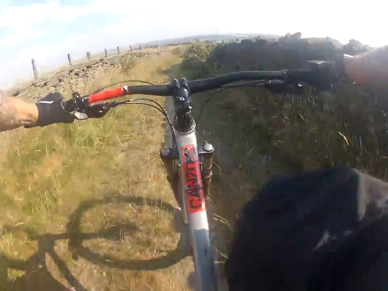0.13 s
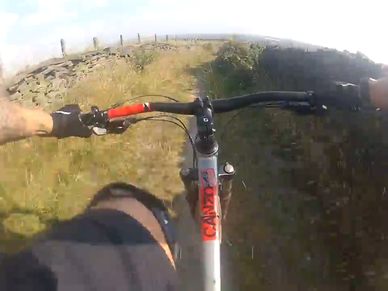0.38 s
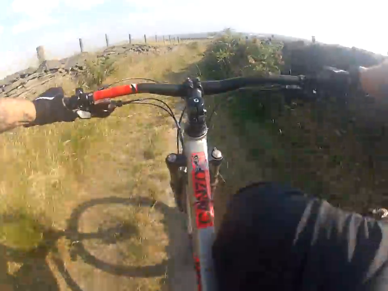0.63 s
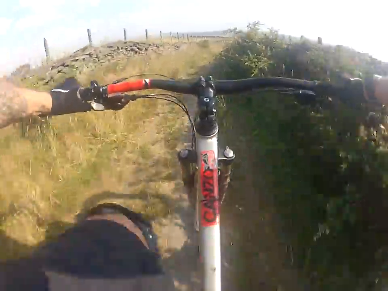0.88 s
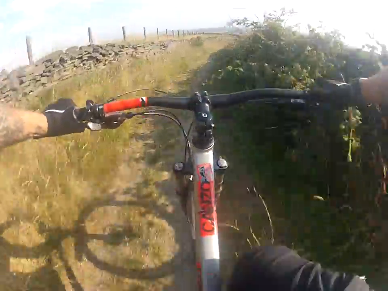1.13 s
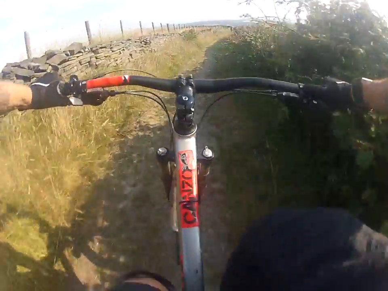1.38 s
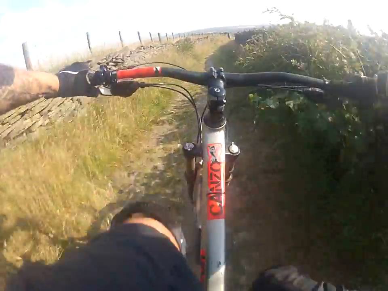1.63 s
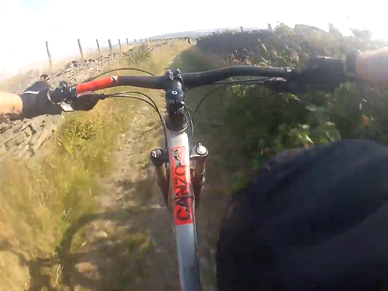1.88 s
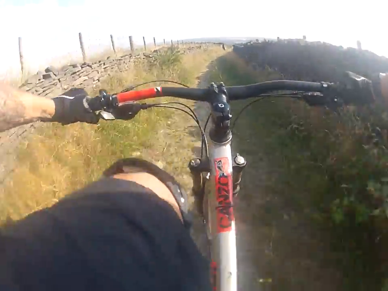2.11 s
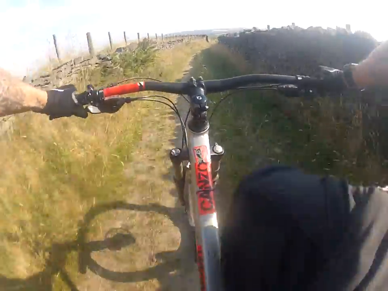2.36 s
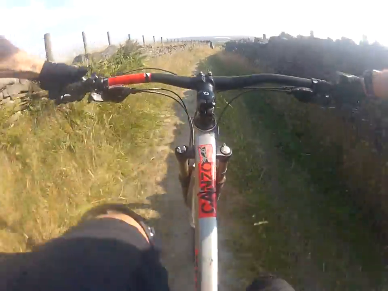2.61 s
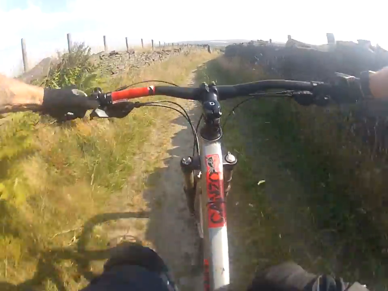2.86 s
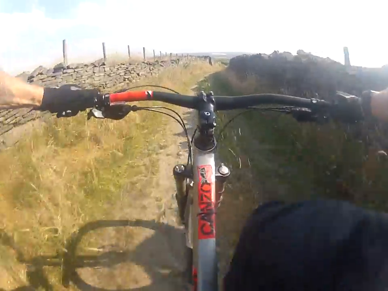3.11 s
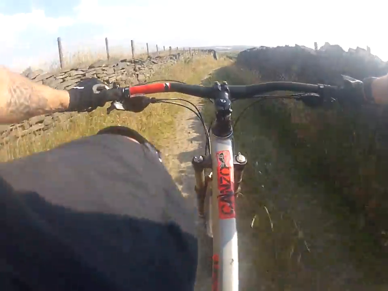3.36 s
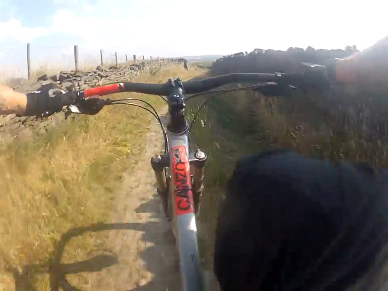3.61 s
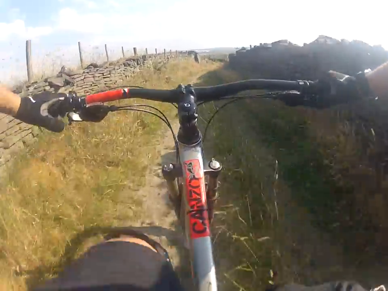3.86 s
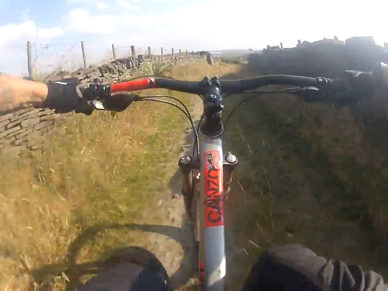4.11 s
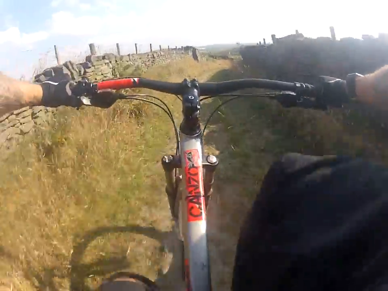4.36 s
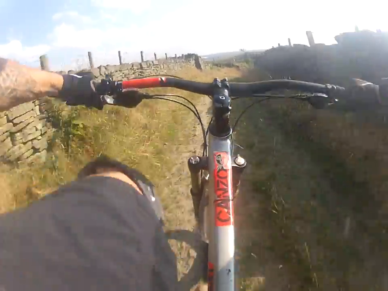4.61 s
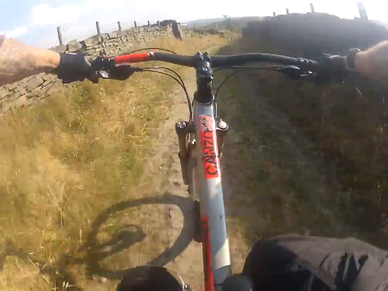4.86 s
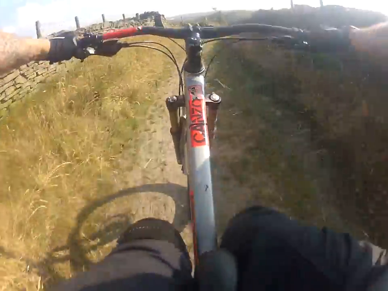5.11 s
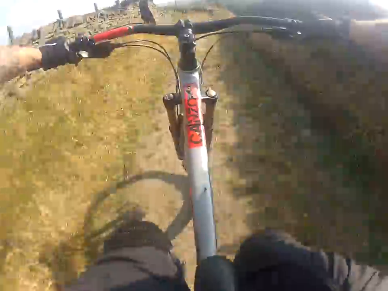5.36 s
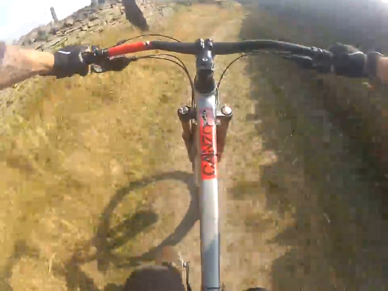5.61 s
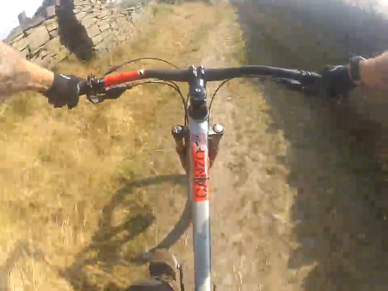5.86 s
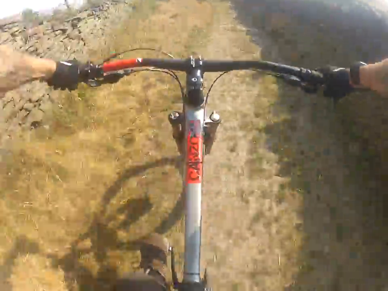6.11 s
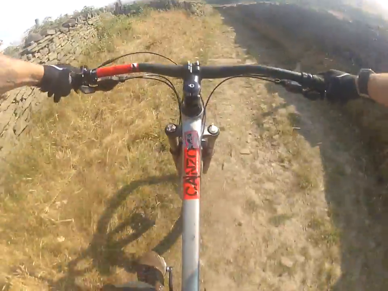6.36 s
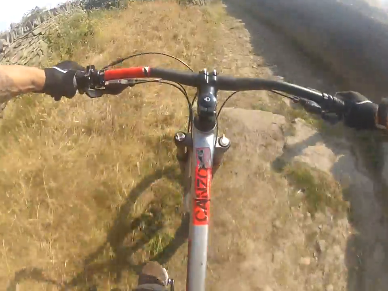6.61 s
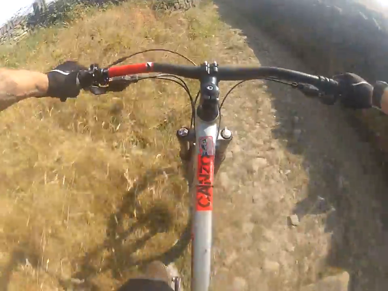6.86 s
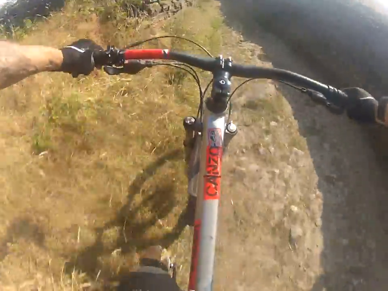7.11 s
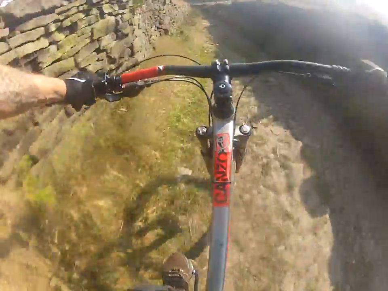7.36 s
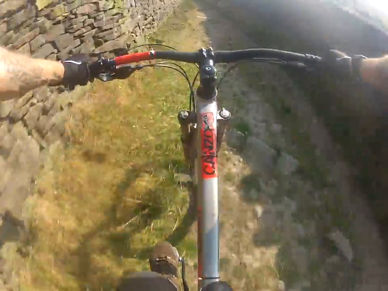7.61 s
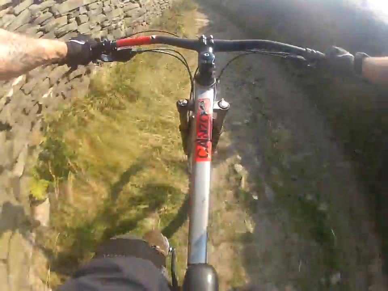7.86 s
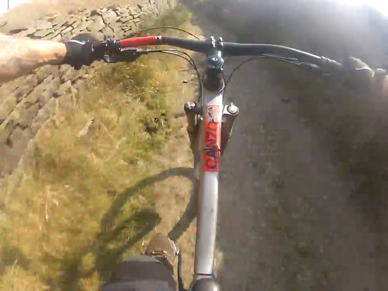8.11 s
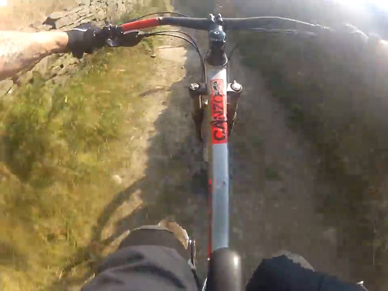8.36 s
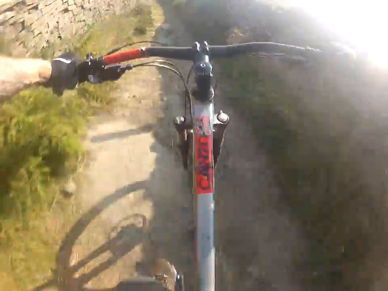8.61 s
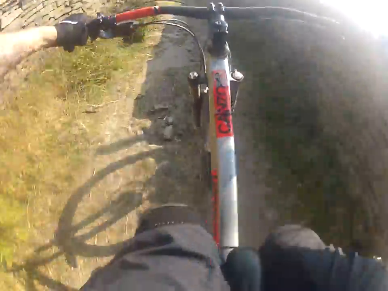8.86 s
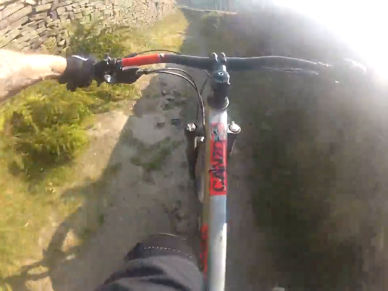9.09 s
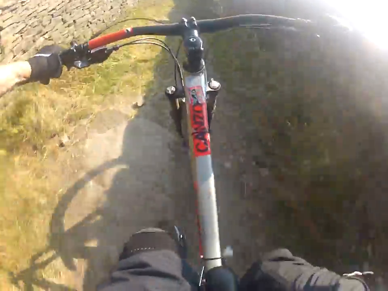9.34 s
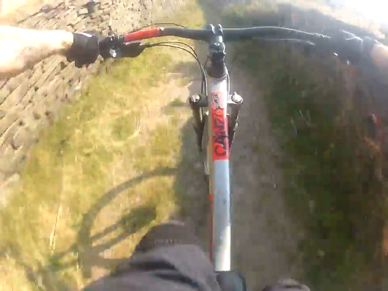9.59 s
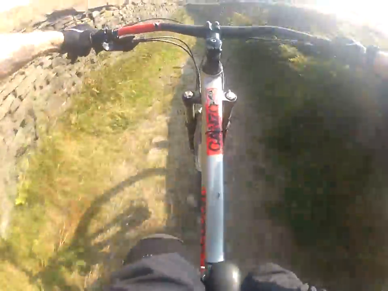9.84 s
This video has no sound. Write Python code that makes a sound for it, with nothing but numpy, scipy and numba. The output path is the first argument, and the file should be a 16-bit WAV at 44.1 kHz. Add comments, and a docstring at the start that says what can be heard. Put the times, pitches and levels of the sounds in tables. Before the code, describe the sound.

Muffled, low-heavy outdoor ride noise from a body-worn microphone in a closed case. Tyres thrum over dirt while the body's sway makes lumpy deep rumble. Bumps arrive as soft but overpowering thuds, loose parts tick and clack, fabric briefly hisses. It is bumpy at first, quieter in the middle, then grittier and harsher over stones, with a violent double bang late on. The treble is thin, crunchy and distorted on the hardest hits.

```python
"""Mountain bike on a stony track

A bike rolls down a stony track, heard by a small camera in a closed case strapped to the rider's chest.
Shaped noise makes the sway, strap thrum, drone and grit; fabric scuffs and loose parts ring case resonances.
Bumps jolt the case as slow pressure pushes, the loudest thing heard.
A gain control ducks the hardest blows; a low-rate converter clips and mirrors all into a thin treble."""
import sys
import numpy as np
from scipy import signal
from scipy.fft import rfft, irfft, next_fast_len
from scipy.io import wavfile
from scipy.ndimage import uniform_filter1d
from numba import njit

SR = 44100
rng = np.random.default_rng(int(sys.argv[2]) if len(sys.argv) > 2 else 0)


def boost(x):
    """Linear amplitude factor 10**(x/20) for a level x in decibels (scalar or array-like)."""
    u = np.asarray(x, float) / 20
    return 10 ** u


def file_out(sig):
    """Save sig as 16-bit WAV at sys.argv[1]."""
    # one column per channel
    cols = np.atleast_2d(sig).T
    # limit, then scale
    lim = np.clip(cols, -1, 1)
    pcm = np.round(lim * 32767).astype(np.int16)
    wavfile.write(sys.argv[1], SR, pcm)


N = 439677
T = np.arange(N) / SR


def unit(x):
    """Scale to rms 1."""
    return x / np.sqrt(np.mean(x ** 2))


def colour(x, points):
    """Shape to a (hz, db) spectrum curve by filtering in the frequency domain, rms 1."""
    hz, db = np.transpose(points)
    size = next_fast_len(N)
    f = np.maximum(np.arange(size // 2 + 1) * SR / size, 1)
    curve_db = np.interp(np.log(f), np.log(hz), db, -120, -120)
    return unit(irfft(rfft(x, size) * boost(curve_db), size)[:N])


def ring(x, modes):
    """Sum of resonances (hz, width_hz, level_db) with alternating sign."""
    out = 0
    for k, (hz, width_hz, db) in enumerate(modes):
        b, a = signal.iirpeak(hz, hz / width_hz, SR)
        out = out + (-1) ** k * boost(db) * signal.lfilter(b, a, x)
    return out


def walk(rate_hz):
    """Random levels held 1 / rate_hz s and slewed twice; spread near 1."""
    k = int(SR / rate_hz)
    held = np.repeat(rng.standard_normal(N // k + 1), k)
    return 1.56 * uniform_filter1d(uniform_filter1d(held, k), k)[:N]


def grains(rate_hz, spread_db, tail_ms, bed):
    """Dense short noise bursts, a few much larger, over a steady bed."""
    sizes_db = spread_db * np.minimum(rng.exponential(size=N), 3)
    starts = (rng.random(N) < rate_hz / SR) * boost(sizes_db)
    fade = np.exp(-1000 / (tail_ms * SR))
    envelope = bed + unit(signal.lfilter([1], [1, -fade], starts))
    return rng.standard_normal(N) * envelope


def add(out, start_s, burst):
    """Mix a burst in at a start time."""
    i = int(start_s * SR)
    part = out[max(i, 0):i + len(burst)]
    part += burst[max(-i, 0):][:len(part)]


# spectrum of the body's sway: hz, level_db
SWAY_CURVE = [(5.9, -9.5), (10, 0), (32, -0.5), (41, -7), (54, -16.5), (90, -14.5), (120, -33), (200, -120)]


def body_sway(level_db, lumps):
    """Deep rumble of the rider's body swaying: low noise that swells in lumps."""
    return colour(rng.standard_normal(N), SWAY_CURVE) * boost(level_db + 2.6 * lumps)


# spectrum of the tyre thrum carried by the straps: hz, level_db
THRUM_CURVE = [(35, -44), (60, -40), (75, -5.5), (108, 0), (129, 1), (175, -10), (230, -25.5), (390, -120)]


def tyre_thrum(level_db, lumps, thrown):
    """The straps thrum to the tyres: low grains that swell in lumps and as the case is thrown."""
    return colour(grains(90, 3.4, 4.8, 1.0), THRUM_CURVE) * boost(level_db + 2.2 * lumps + 2.9 * thrown)


# spectrum of the frame's drone: hz, level_db
DRONE_CURVE = [(100, -78), (170, -0.5), (268, -1.5), (356, -4.5), (480, -19), (620, -32), (1060, -120)]


def frame_drone(level_db, lumps, thrown):
    """Frame drone: grains just above the thrum, with gentler lumps."""
    return colour(grains(100, 2.5, 5.4, 1.46), DRONE_CURVE) * boost(level_db + 0.79 * lumps + 1.34 * thrown)


# spectrum of grit in the case: hz, level_db
GRIT_CURVE = [(240, -32), (400, -7), (535, -4), (578, -3), (774, -3), (975, -3), (1180, -5), (1350, -2.5),
              (1540, -6.5), (1720, -1), (2140, 1), (2750, -13.5), (3100, -25), (4030, -33.5), (6820, -120)]


def grit_impacts(level_db, bright, shake, thrown):
    """Grit ticking in the case: dull strikes below 1500 Hz, separate bright strikes above."""
    dull = grains(120, 0.99, 13.0, 1.45)
    low = signal.butter(4, 1500, fs=SR, output="sos")
    impacts = bright + signal.sosfiltfilt(low, dull - bright)
    return colour(impacts, GRIT_CURVE) * boost(level_db + 0.7 * shake + 1.2 * thrown)


# spectrum of the fine rush over the grit: hz, level_db
RUSTLE_CURVE = [(1710, -21.5), (2900, -2.5), (3220, -2), (3620, 3.5), (4110, -2), (4340, -8), (5250, -5),
                (5900, -13), (7670, -49), (13000, -120)]


def fine_rustle(grit_db, bright, shake, thrown):
    """A dense treble rush: fine grains mixed with the bright grit, rising with the grit level."""
    level_db = -56.5 + 0.55 * (grit_db + 46)
    fine = grains(70, 6.5, 4.0, 0.97)
    return colour(fine + 0.53 * bright, RUSTLE_CURVE) * boost(level_db + 1.87 * shake + 1.95 * thrown)


# the ride's base levels, before lumps and rattle: time_s, grit_db, thrum_db, drone_db, sway_db
RIDE_LEVELS = [(0.0, -45, -32, -45, -26.5), (0.36, -51, -47, -54, -32), (0.72, -46.5, -35.5, -48.5, -24),
               (1.22, -50, -41, -47.5, -26.5), (1.44, -46.5, -36, -48.5, -31.5),
               (1.83, -45.5, -40, -47.5, -22.5), (2.03, -45.5, -35, -44.5, -24.5),
               (2.22, -48.5, -40, -49, -25.5), (2.47, -48.5, -43.5, -49, -28),
               (2.72, -47.5, -31.5, -48, -24), (2.83, -50, -42, -47.5, -31), (3.05, -47.5, -40, -47.5, -27),
               (4.41, -50.5, -44.5, -49, -28), (4.75, -47, -42.5, -46, -26.5),
               (5.75, -45, -36.5, -42.5, -29.5), (6.16, -40.5, -29, -38.5, -22.5),
               (6.36, -46, -42.5, -45, -31.5), (6.58, -48, -36.5, -44, -25), (7.33, -42.5, -32, -39, -23),
               (7.61, -46, -35, -42.5, -26), (7.86, -40.5, -33, -35.5, -25), (8.08, -46.5, -34.5, -40, -25),
               (8.36, -42, -37.5, -46, -27.5), (8.58, -35.5, -31, -35, -28.5),
               (8.72, -50.5, -31.5, -41, -27.5), (8.94, -45, -33, -43.5, -24), (9.33, -42, -35, -41, -29),
               (9.97, -40.5, -34, -43, -25.5)]


def rolling(bumps):
    """The faster the bumps throw the case about, the more everything on it rattles over the sway."""
    time_s, *columns = np.transpose(RIDE_LEVELS)
    grit_db, thrum_db, drone_db, sway_db = (np.interp(T, time_s, c) for c in columns)
    speed = uniform_filter1d(np.abs(np.gradient(bumps)), int(0.039 * SR))
    thrown = np.log1p(np.minimum(speed / np.mean(speed), 6.5))
    lumps = walk(14)
    shake = walk(32)
    bright = grains(150, 3.9, 5.0, 1.6)
    low = body_sway(sway_db, lumps) + tyre_thrum(thrum_db, lumps, thrown)
    middle = frame_drone(drone_db, lumps, thrown) + grit_impacts(grit_db, bright, shake, thrown)
    return low + middle + fine_rustle(grit_db, bright, shake, thrown)


# cloth dragged over the case, drive into its resonances: start_s, drive_db, length_ms
SCUFF_EVENTS = [(0.186, -35, 10), (0.311, -29, 11), (0.338, -26, 18.3), (0.7693, -26.5, 12.4),
                (1.554, -32, 15), (1.575, -31.5, 16), (1.851, -21.5, 6.2), (1.922, -28, 12.6),
                (1.944, -32, 10), (2.125, -39, 16), (2.574, -29, 23), (2.681, -33, 9.8), (2.693, -25, 14),
                (2.831, -36, 11), (3.87, -34, 6.1), (5.007, -42, 16), (5.958, -41, 12), (6.056, -38, 15),
                (6.091, -28.5, 20), (6.148, -29.5, 25), (6.166, -32, 28), (6.206, -33, 21), (6.24, -35, 17),
                (6.268, -32, 12), (6.297, -36.5, 34), (6.451, -36, 9.2), (6.627, -30, 8.9),
                (6.655, -41, 6.5), (6.6657, -28, 7.7), (6.87, -39, 12), (7.221, -24, 6.5),
                (7.242, -28.5, 17), (7.361, -38, 9.2), (8.067, -36, 25), (8.09, -29, 16), (8.221, -34.5, 9),
                (8.625, -31, 13), (8.652, -31.5, 18), (8.675, -31, 16), (9.602, -32.5, 28),
                (9.632, -26, 11), (9.699, -40, 12)]
# resonances of the scuffed case: hz, width_hz, level_db
SCUFF_MODES = [(4813, 510, 0), (3130, 850, -2.5), (5590, 320, -5)]


def scuffs():
    """Fabric catches and stops: short, flat, flickering hisses ring the scuff resonances twice over."""
    drive = np.zeros(N)
    for start_s, db, ms in SCUFF_EVENTS:
        t_ms = np.arange(int(max(ms, 2) * SR / 1000)) * 1000 / SR
        rise = np.minimum(t_ms / 0.2, 1)
        stop = np.minimum((t_ms[-1] - t_ms) / 3, 1)
        add(drive, start_s, boost(db) * rise * stop)
    hiss = drive * boost(2.0 * walk(200)) * rng.standard_normal(N)
    return boost(1.5) * ring(ring(hiss, SCUFF_MODES), SCUFF_MODES)


# falling squeak: start_s, start_hz, end_hz, peak_db, length_ms
SQUEAK_EVENTS = [(2.764, 4040, 3460, -34, 14)]


def squeaks():
    """A sine glides down ever faster, swelling and fading."""
    out = np.zeros(N)
    for start_s, start_hz, end_hz, db, ms in SQUEAK_EVENTS:
        u = np.linspace(0, 1, int(ms * SR / 1000))
        pitch_hz = start_hz + (end_hz - start_hz) * u ** 2
        tone = np.sin(2 * np.pi * np.cumsum(pitch_hz) / SR)
        add(out, start_s, boost(db) * np.sin(np.pi * u ** 1.8) * tone)
    return out


# loose parts striking: start_s, drive_db, place (0 body, 1 shell, 2 rim, 3 lid, 4 clip; may lie between
# or beyond), loss_db (one place away), tail_ms
STRIKES = [(0.037, -29, 0, 10, 2.5), (0.159, -36, -1, 0.5, 4.7), (0.287, -40, 2.5, 11, 3.1),
           (0.301, -27.5, 0.5, 13, 7.8), (0.326, -26.5, 2, 1.5, 3.9), (0.423, -34, 3, 18, 2.8),
           (0.637, -43.5, 2.5, -1, 3.5), (0.998, -37, 3, 9, 6.6), (1.193, -38, .3, 3, 2.5),
           (1.301, -31.5, 0, 13, 3.4), (1.424, -22, .4, 11, 2.8), (1.495, -30, 3, 22, 3.7),
           (1.543, -35, -1, 0, 5), (1.689, -34.5, 3.5, 5, 3), (1.853, -15, 3, 21, 2.6),
           (1.934, -23.5, 2, 3, 3.3), (1.957, -22.5, 3.5, 20, 3), (1.975, -20.5, 3.5, 22, 4),
           (2.001, -31, 3, 17, 2.8), (2.051, -22.5, 2, 4, 2.5), (2.094, -22.5, 3, 18, 3.5),
           (2.151, -27.5, 2.5, 13, 17), (2.625, -36, -0.5, 12, 2.8), (2.727, -34, 0.7, 17, 2.5),
           (2.831, -20.5, 3.5, 17, 4.6), (2.869, -36, 2, 22, 3.1), (2.934, -33, 3.2, 15, 3.5),
           (2.972, -33, -0.7, 12, 2.2), (3.049, -33.5, 3, 21, 4.8), (3.09, -39, .9, 12, 3),
           (3.411, -35.5, 0.9, 6, 9.4), (3.798, -35.5, 2.5, 17, 4.2), (3.845, -32.5, 3, 26, 2.8),
           (3.872, -19, 3.5, 18.5, 5), (4.257, -29, 2.2, 28, 2), (4.853, -34, 2.5, 15, 2.2),
           (5.507, -40, 2, 16, 2.3), (5.829, -33, 3.5, 3, 5.7), (5.958, -30.5, 5.5, 1, 6.2),
           (6.157, -23, 0, 4, 4.9), (6.297, -29, 3, 8, 4.2), (6.325, -32, 3, 18, 3.1),
           (6.367, -29.5, 3.5, 10, 4.3), (6.493, -33, 3.5, 6, 7), (6.754, -35, 3, 4, 2.6),
           (6.823, -34, 5.5, 6, 3.3), (6.834, -30, 6, 3, 5.3), (7.035, -27, 3.5, 14, 3.4),
           (7.116, -24, 0.25, 4, 5.8), (7.211, -20, .5, 10, 4.6), (7.279, -34.5, 4, 1.5, 4.5),
           (8.009, -33, 0.5, 5, 4.5), (8.043, -32.5, 2.5, 7, 3.5), (8.163, -34.5, 3, 11, 3.9),
           (8.617, -14.5, 0, 14, 4.9), (8.677, -28.5, 2.5, 3, 8.5), (8.696, 0.5, 1.1, 12.5, 2.1),
           (8.704, -18, 0, 14, 7.4), (8.743, -10, 0, 4.5, 5.3), (8.821, -26.5, -0.8, 3, 6.3),
           (9.168, -27, 2.5, 16, 3.4), (9.529, -28, 0.5, 8, 2.6), (9.761, -28, 4.5, 21, 6.2),
           (9.81, -28, 3, 15, 4.7)]
# by place: strength of the blow against its rough tail [ratio]
BLOW_SHARE = [4.57, 2.08, 1.52, 0.87, 0.52]
# by place: the most a strike loses on the way [dB]
MAX_LOSS_DB = [22.222, 27, 29.16, 20.9, 28]
# resonances of each part of the case: hz, width_hz, level_db
BODY_MODES = [(277, 77, 1), (445, 460, -10)]
SHELL_MODES = [(938, 345, -1.5), (638, 90, -12)]
RIM_MODES = [(1095, 860, 4.5), (1540, 2900, -4.5)]
LID_MODES = [(2086, 280, -2), (2560, 920, -16.5)]
CLIP_MODES = [(3580, 420, 0)]


def clatter():
    """A tap with a rough tail rings the parts of the case, weaker with distance from the place struck."""
    drive = np.zeros((5, N))
    t_ms = np.arange(int(0.04 * SR)) * 1000 / SR
    tap = np.exp(-(t_ms / 0.076 - 2) ** 2)
    for start_s, db, place, loss_db, ms in STRIKES:
        distance = np.abs(np.arange(len(drive)) - place)
        mix_db = -np.minimum(loss_db * distance ** 1.8, MAX_LOSS_DB)
        noise = rng.standard_normal(len(t_ms))
        tail = noise * np.exp(-t_ms / max(ms, 0.3)) * (1 - np.exp(-t_ms / 0.4))
        # the low modes answer mostly to the blow, the high ones to the rough tail
        for row, share_db, blow in zip(drive, mix_db, BLOW_SHARE):
            add(row, start_s, boost(db + share_db) * (blow * tap + tail))
    body = ring(drive[0], BODY_MODES)
    # the others are mounted on a second, broader resonance, so they swell before they fade
    shell = ring(ring(drive[1], SHELL_MODES), [(836, 440, 0)])
    rim = ring(ring(drive[2], RIM_MODES), [(1280, 2600, 0)])
    lid = ring(ring(drive[3], LID_MODES), [(2170, 700, 0)])
    clip = ring(ring(drive[4], CLIP_MODES), [(3800, 11000, 0)])
    low = boost(14.5) * body + boost(15.5) * shell + boost(12.0) * rim
    return low + boost(20.0) * lid + boost(11.5) * clip


# bumps passed through the harness: time_s (centre of push), push_db, push_ms, rebound (share of the push)
BUMPS = [(0.088, -14.5, 7.8, .5), (0.171, -6, 9.4, .6), (0.307, -4, 3.36, 0.72), (0.313, -3.5, 5, 0.22),
         (0.326, -16, 3.8, 2.2), (0.764, 5.5, 4.45, 0.18), (1.046, -22, 12, 1.1), (1.303, -20, 9.9, 1.2),
         (1.422, -9, 6, .05), (1.496, -19, 8.8, .05), (1.547, -4.5, 8.5, 0.27), (1.91, -17, 4.5, .05),
         (1.917, -6, 4, .05), (1.926, -14.5, 6.8, 1.8), (2.026, -10.5, 3.9, .05), (2.127, -4.5, 8.6, 0.48),
         (2.242, -20, 5.9, .05), (2.303, -20, 14, .52), (2.349, -18, 16, 0.96), (2.457, -12.5, 13, .63),
         (2.556, -8.5, 4.9, .06), (2.569, -9.5, 9.2, 0.87), (2.63, -6.5, 5.8, .47),
         (2.676, -5.5, 11.3, 0.68), (2.7, -19, 9.6, 0.25), (2.732, -1.5, 6.3, .36), (2.787, -7, 9.4, 0.88),
         (2.858, -14, 8.5, 1), (2.984, -7, 11, 0.64), (3.008, -21, 10, .5), (3.035, -14.5, 14, 0.82),
         (3.094, -6.5, 6.9, .6), (3.146, -15, 13.4, 0.25), (3.241, -25, 13, 0.48),
         (3.802, -14.5, 4.8, 0.33), (3.937, -18, 17, 1.1), (3.986, -17, 17, .54), (4.04, -17, 15, 0.78),
         (4.119, -12.5, 7.4, 0.68), (4.151, -12, 11.3, 0.72), (4.309, -25, 13, 0.91),
         (4.348, -17, 15.4, 0.57), (4.496, -19, 7.6, .63), (4.864, -17.5, 8.2, .95),
         (5.225, -13.5, 12, .05), (5.356, -16.5, 13, 1.05), (5.633, -19, 6.5, .3), (5.902, -15.5, 9.1, .82),
         (6.041, -12.5, 15, 0.5), (6.106, -22, 4.1, .95), (6.115, -17, 3.7, .05), (6.125, -21, 3.4, .3),
         (6.166, 4.5, 5.8, .2), (6.268, -10.5, 3.8, .05), (6.278, -10.5, 7.9, .64), (6.39, -18.5, 8.1, .75),
         (6.652, -9, 9.8, .54), (6.796, -17, 9, 0.79), (6.865, -15, 9.5, 0.85), (6.949, -15.5, 15, 0.65),
         (7.088, -13, 11, .95), (7.121, -14.5, 11, .56), (7.22, 3.5, 5.05, 0.062), (7.351, -12, 13, 0.27),
         (7.489, -25, 3.1, .05), (7.555, -7.5, 9.2, 0.56), (7.605, -12.5, 12, .4), (7.785, -25, 2.9, .05),
         (8.025, -5.5, 9, 0.73), (8.071, -9.5, 9.7, .41), (8.156, -12, 9.1, .61), (8.199, -14, 7.7, .17),
         (8.255, -14.5, 9.3, .05), (8.623, 8, 3.9, .05), (8.631, -1.5, 2.6, .94), (8.687, -12, 1.5, 0.83),
         (8.75, 9.5, 4.2, 0.37), (8.83, -5, 4, 0.29), (9.226, -19, 3.1, .35), (9.387, -23, 14, 0.79),
         (9.592, -20, 4, 0.54), (9.712, -17, 4.3, .11), (9.758, -15.5, 3.5, .39), (9.851, -10.5, 11, .53)]


def jolts():
    """The case sags, is pushed hard, then swings back more slowly."""
    out = np.zeros(N)
    for time_s, db, ms, rebound in BUMPS:
        u = np.arange(-4 * ms, 8 * ms, 1000 / SR) / ms  # time in push lengths
        push = np.exp(-(u / 0.51) ** 2)
        # quick pushes sag deeper first
        sag_share = max(0.32 - 0.018 * ms, 0)
        sag = sag_share * np.exp(-((u + 1.32) / 0.44) ** 2)
        swing_at, swing_width = 1.2 + 3.04 / ms, 0.62 + 1.7 / ms
        swing = max(rebound, 0) * np.exp(-((u - swing_at) / swing_width) ** 2)
        add(out, time_s - 4 * ms / 1000, boost(db) * (push - sag - swing))
    return out


def scene():
    """The ride, shaken by its bumps, with the bumps, strikes and cloth on top."""
    bumps = jolts()
    return (rolling(bumps) + scuffs() + squeaks() + clatter() + bumps)[None]


@njit
def follow(x, attack, release):
    """Envelope that rises fast and falls slowly."""
    e, out = 0., np.empty(len(x))
    for i in range(len(x)):
        e += (abs(x[i]) - e) * (attack if abs(x[i]) > e else release)
        out[i] = e
    return out


def gain_control(dry):
    """Ducks by 0.45 dB for each dB that the envelope passes the threshold."""
    threshold, attack_s, release_s = 0.57, 0.0039, 0.057
    loud = follow(dry[0], 1 / (attack_s * SR), 1 / (release_s * SR))
    return dry * (threshold / np.maximum(loud, threshold)) ** 0.45


def low_rate_converter(x):
    """Samples at 12 kHz, clips and holds: the steps mirror the sound about 6 and 12 kHz."""
    up, down, hold = 40, 147, 4  # 44.1 kHz * 40 / 147 = 12 kHz; each sample repeated 4 times
    slow = np.clip(signal.resample_poly(x, up, down, axis=1), -1, 1)
    steps = np.repeat(slow, hold, axis=1)
    held = signal.resample_poly(steps, down, up * hold, axis=1)[:, :N]
    lowpass = signal.cheby2(10, 40, 15600, fs=SR, output="sos")
    return np.clip(signal.sosfilt(lowpass, held), -1, 1)


def roll_off(x):
    """The treble ends steeply here."""
    return signal.sosfilt(signal.butter(12, 16110, fs=SR, output="sos"), x)


def record(dry):
    """The camera's chain: gain control, then the low-rate converter."""
    mix = low_rate_converter(gain_control(dry))
    return roll_off(mix)


dry = scene()
out = record(dry)
file_out(out)
```